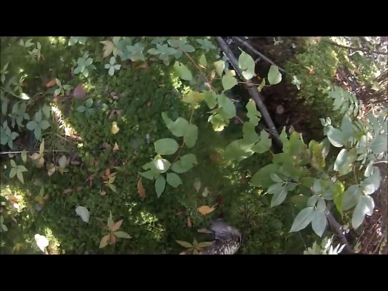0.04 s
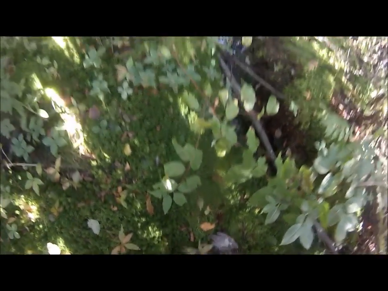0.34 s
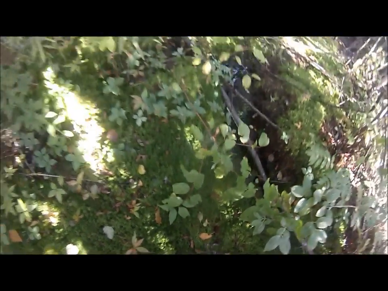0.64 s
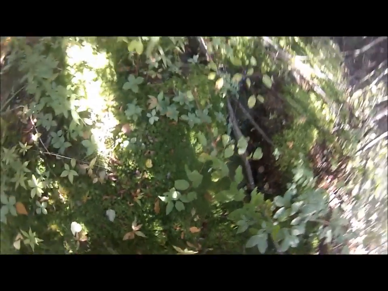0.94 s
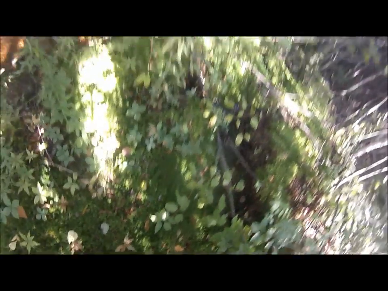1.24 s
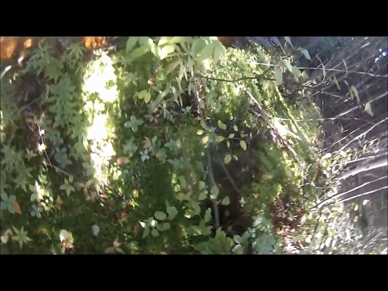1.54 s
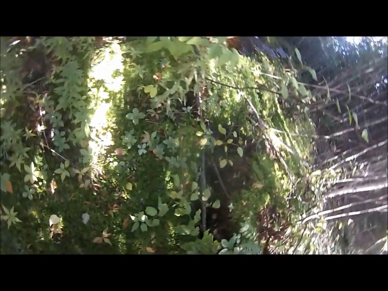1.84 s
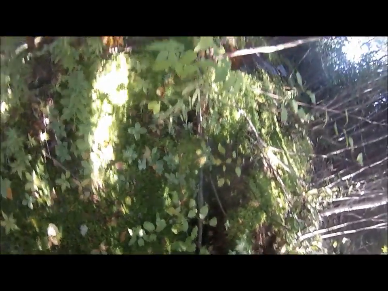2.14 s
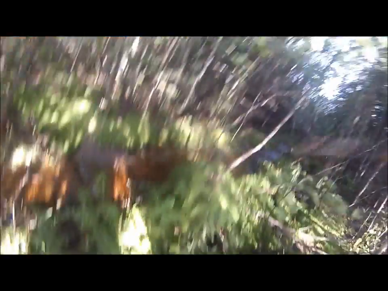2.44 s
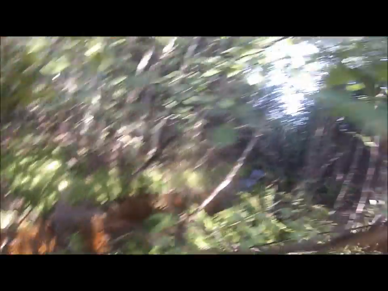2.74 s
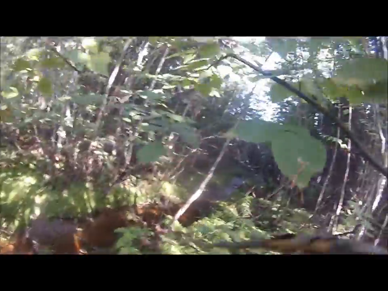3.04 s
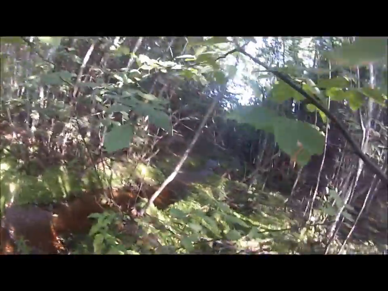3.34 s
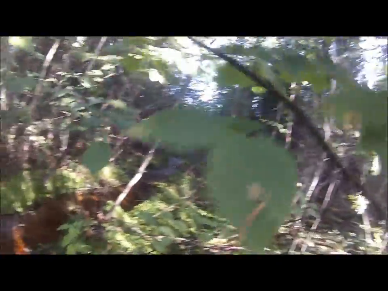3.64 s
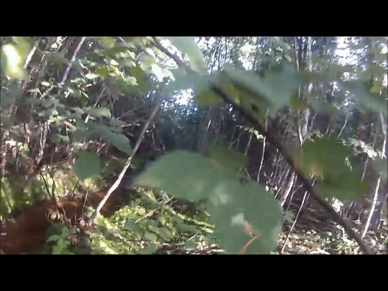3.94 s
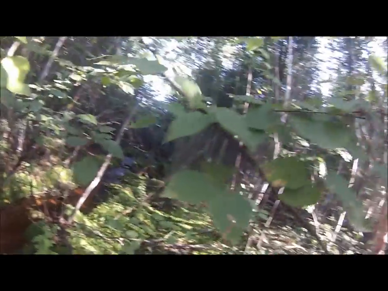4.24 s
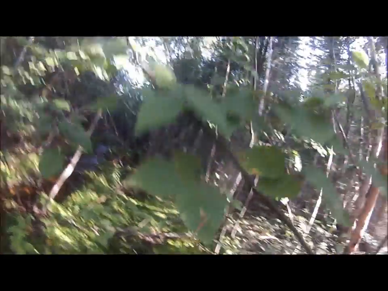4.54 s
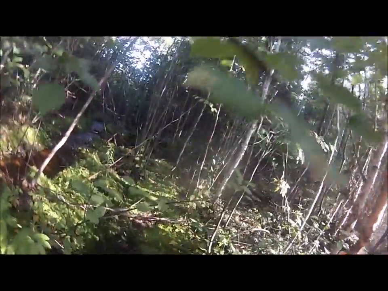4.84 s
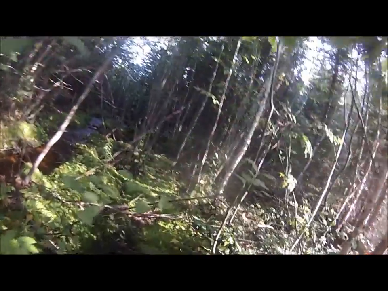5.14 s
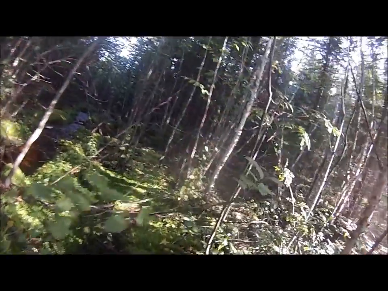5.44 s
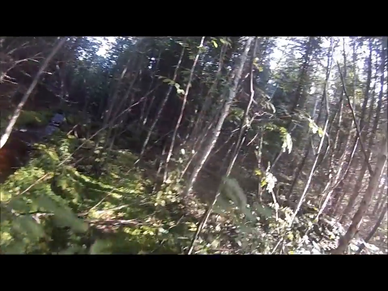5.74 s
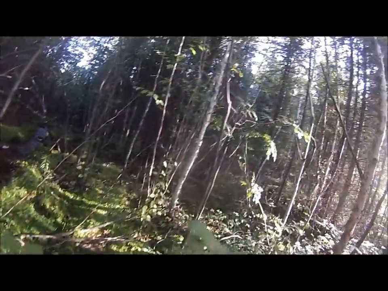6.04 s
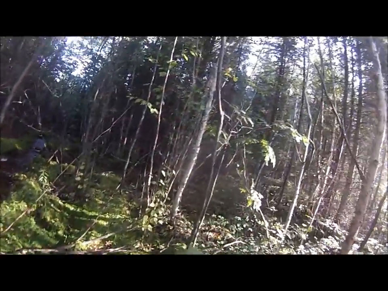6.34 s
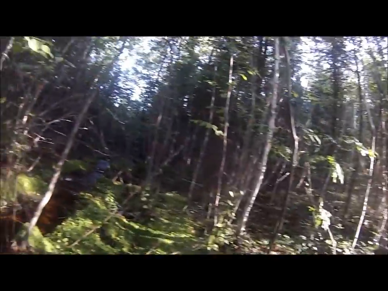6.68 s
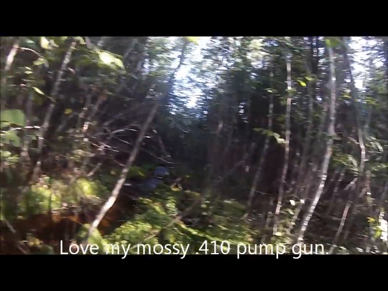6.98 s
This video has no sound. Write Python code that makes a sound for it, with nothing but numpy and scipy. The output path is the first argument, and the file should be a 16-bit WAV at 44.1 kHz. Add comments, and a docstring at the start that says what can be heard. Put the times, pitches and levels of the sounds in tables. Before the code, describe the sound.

Over a faint hush of forest air, hands shift on a pump-action gun with soft, low bumps. About three seconds in, the slide is pulled back with knocks and a coarse scrape, and slams into its stop. A brief low hum follows, then the slide rattles forward and locks with sharp, ringing clacks. Light handling noise trails off. The microphone is fixed to the gun, so everything booms and the hardest hit slightly overloads.

```python
"""A pump-action gun, raised and worked in a quiet forest, heard from a small camera clamped to it.
The slide scrapes back and slams into its stop, parts knock, then it rides forward and locks shut.
The microphone is at contact distance: the action reaches it through the mount and the plastic
housing, which boom, ring and overload it. Behind the handling lies a faint hush of air."""
import sys
import numpy as np
from scipy import signal
from scipy.fft import rfft, irfft, next_fast_len
from scipy.io import wavfile
from scipy.ndimage import uniform_filter1d, map_coordinates

SR = 44100
rng = np.random.default_rng(int(sys.argv[2]) if len(sys.argv) > 2 else 0)


def log_audio(samples):
    """Write samples as a 16-bit WAV file to the path given in sys.argv[1]."""
    # one column per channel
    frames = np.atleast_2d(samples).T
    # limit to full scale, then quantise
    limited = np.clip(frames, -1, 1)
    pcm = np.round(limited * 32767).astype(np.int16)
    wavfile.write(sys.argv[1], SR, pcm)


N = 317961
T = np.arange(N) / SR
AGE = np.arange(SR // 4) / SR  # seconds since a hit


def amp(db):
    """Decibels to gain."""
    return 10 ** (np.asarray(db) / 20)


def unit(x):
    """Scale to rms 1."""
    return x / np.sqrt(np.mean(x ** 2) + 1e-20)


def unit_hit(x):
    """Scale a hit so that its loudest 5 ms have rms 1."""
    return x / np.sqrt(uniform_filter1d(x ** 2, size=220, mode="constant").max())


def curve(points):
    """Join (time_s, value) points, per sample."""
    return np.interp(T, *np.transpose(points))


def wobble(rate):
    """A smooth random curve, rate knots a second."""
    return map_coordinates(rng.standard_normal(int(N * rate / SR) + 4), [T * rate])


def stroke(start, end, attack_s, release_s):
    """One movement: it sets in, holds until its end, then falls 60 dB in the release time."""
    return np.clip((T - start) / attack_s, 0, 1) * amp(-60 * np.maximum(T - end, 0) / release_s)


def together(envelopes):
    """Overlapping movements add in power."""
    return np.sqrt(sum(e ** 2 for e in envelopes))


def add(track, time_s, sound):
    """Mix a sound into the track."""
    part = track[round(time_s * SR):][:len(sound)]
    part += sound[:len(part)]


def filtered(x, response):
    """Shape x by a function of frequency."""
    size = next_fast_len(len(x) + 8192)
    return irfft(rfft(x, size) * response(np.fft.rfftfreq(size, 1 / SR)), size)[:len(x)]


def soften(x, corner_hz):
    """A steep treble roll-off, as through a soft joint."""
    return signal.sosfilt(signal.butter(4, min(corner_hz, SR / 2 - 1), fs=SR, output="sos"), x)


def noise(spectrum, length=N):
    """Noise with a (freq_hz, level_db) spectrum, at rms 1."""
    freqs, db = np.transpose(spectrum)
    white = rng.standard_normal(length)
    return unit(filtered(white, lambda hz: amp(np.interp(np.log(hz + 1), np.log(freqs), db))))


def ring(modes):
    """Damped (pitch_hz, level_db, t60_s) modes, struck with new strengths each time."""
    out = np.zeros(len(AGE))
    for hz, db, t60 in modes:
        strength = amp(db + 1.5 * rng.standard_normal())
        swell = 1 - np.exp(-(4 * hz * AGE) ** 2)
        out += strength * swell * amp(-60 * AGE / t60) * np.sin(2 * np.pi * hz * AGE)
    return out


# the air all around, with the microphone's own hiss: freq_hz, relative_db
HUSH_SPECTRUM = [(140, -29.5), (230, 0), (275, -3.5), (346, -2), (421, -5.5), (485, -3.5), (530, -5),
                 (589, -5), (1180, -9), (1620, -6.5), (1870, -9.5), (4790, -16.5), (13400, -29.5),
                 (14400, -34.5), (16000, -55)]
def forest():
    """A faint, even hush of air and microphone hiss."""
    return amp(-61.5 + 0.35 * wobble(1.8)) * noise(HUSH_SPECTRUM)


# hand movement at the microphone: freq_hz, relative_db
RUMBLE_SPECTRUM = [(12, -13), (25, -3.5), (55, -1.5), (90, -8), (130, -23.5), (250, -74.5)]
def rumble():
    """The deep noise of hands holding the gun."""
    return noise(RUMBLE_SPECTRUM)


# lurches that swing the camera harder: peak_s, relative_db
CAMERA_LURCHES = [(.78, -39), (1.41, -35.5), (2.41, -26.5), (3.03, -23), (3.74, -19.5), (3.83, -22),
                  (4.09, -28.5), (5.58, -35), (5.91, -38)]
def camera_sway(moves, sway_hz=45, lurch_width_s=0.03):
    """The camera swings on its springy mount, even a little at rest."""
    lurches = [amp(db) * np.exp(-0.5 * ((T - s) / lurch_width_s) ** 2) for s, db in CAMERA_LURCHES]
    resting = amp(-50 + 2.7 * wobble(14))
    swaying = together([resting] + moves + lurches)
    phase = 2 * np.pi * sway_hz * T + 0.8 * wobble(6) + 0.5 * wobble(25)
    flutter = amp(-9.5) * rumble()
    return swaying * amp(2 + 1.6 * wobble(24)) * (np.sin(phase) + flutter)


# the plastic shell around the microphone: freq_hz, relative_db
BOOM_SPECTRUM = [(30, -18), (60, -13.5), (88, -10), (108, -8.5), (135, 0.5), (174, -3), (205, -21),
                 (280, -29.5), (500, -72)]
def housing_boom(moves, rest_db=-64.5):
    """The housing booms as the grip moves."""
    gripping = together([amp(rest_db)] + moves)
    boom = noise(BOOM_SPECTRUM)
    power = uniform_filter1d(np.abs(signal.hilbert(boom)) ** 2, size=2400) / 2
    boom /= np.sqrt(power)  # the hands keep an even strength
    return gripping * amp(2.5 * wobble(23)) * boom


# low modes of the whole camera: pitch_hz, relative_db, t60_s
THUD_MODES = [(45, -17.5, 0.3), (133.7, 2, .055), (177, -0.5, 0.015)]
def thud(corner_hz):
    """A dull push on the whole camera."""
    return unit_hit(soften(ring(THUD_MODES), corner_hz))


# the grip shifts, close to the microphone: start_s, level_db
GRIP_SHIFTS = [(0.271, -46.5), (0.683, -40), (.73, -50), (.785, -48), (0.848, -47), (1.354, -45),
               (1.489, -43), (2.231, -35), (2.374, -25), (4.07, -29), (4.47, -43), (4.569, -41.5),
               (4.854, -35.5), (5.135, -37), (5.164, -39.5), (7.16, -41)]
def grip_bumps():
    """Each shift of the grip gives the camera a soft thud."""
    out = np.zeros(N)
    for start, db in GRIP_SHIFTS:
        add(out, start, amp(db) * thud(corner_hz=170))
    return out


# lift, pull, hold open, push, lock, aim: start_s, end_s, sway_relative_db, boom_db
HAND_MOVES = [(0.654, 0.864, -37, -49.5), (1.324, 1.64, -42.5, -62), (2.209, 2.85, -39, -49.5),
              (2.87, 3.041, -23.5, -20.5), (3.048, 3.181, -27, -30), (3.24, 3.605, -30, -48),
              (3.605, 3.88, -26, -31), (3.877, 4.113, -31, -47), (4.218, 4.576, -50, -54.5),
              (5.299, 6.0, -43.5, -53.5), (6.04, 6.503, -43, -58)]
def handling(attack_s=0.023):
    """Moving the gun sways the camera and booms its housing; the hands never quite rest."""
    sways, booms = [], []
    for start, end, sway_db, boom_db in HAND_MOVES:
        sways.append(amp(sway_db) * stroke(start, end, attack_s, release_s=0.35))
        booms.append(amp(boom_db) * stroke(start, end, attack_s, release_s=0.23))
    sway = camera_sway(sways)
    tremor = amp(-52.5 + 1.2 * wobble(9)) * unit(soften(rumble(), corner_hz=55))
    return sway + tremor + housing_boom(booms) + grip_bumps()


# the hollow barrel, heard through the mount: pitch_hz, level_db, t60_s
BARREL_MODES = [(317.5, -15.5, 0.14), (541, -20, 0.1), (644, -17.5, 0.166)]
def open_breech(hum_hz=118.4):
    """With the action open a part hums on until the hand pushes forward, and a knock rings the barrel."""
    hum_db = curve([(3.18, -120), (3.195, -25.5), (3.6, -29.5), (3.66, -120)])
    out = amp(hum_db) * np.sin(2 * np.pi * hum_hz * T)
    add(out, 3.484, ring(BARREL_MODES))
    return out


def rattle(start_s=3.64, end_s=3.84, ticks_per_s=45, pitch_hz=2270):
    """The loose fore-end gives small, dull ticks, unevenly spaced along its forward ride."""
    out = np.zeros(N)
    modes = [(pitch_hz, 0, 0.035), (pitch_hz * 0.87, -7, 0.02), (pitch_hz, -6, 0.02)]
    slots = np.arange(start_s, end_s, 1 / ticks_per_s)
    for slot, (late, size) in zip(slots, rng.standard_normal((len(slots), 2))):
        tick = unit_hit(soften(ring(modes), corner_hz=2700))
        add(out, slot + 0.43 * late / ticks_per_s, amp(-39 + 3 * size) * tick)
    return out


def slips(per_s, spread_db):
    """Tiny stick-slip impulses of uneven size."""
    slipping = rng.random(N) < per_s / SR
    return slipping * rng.choice([-1, 1], N) * amp(spread_db * rng.standard_normal(N))


def friction(impulses, peaks, corner_hz):
    """Slips excite resonances of alternating polarity; the result has rms 1."""
    def response(f):
        return sum((-1) ** k * amp(db) * 1j * f * width / (hz * hz - f * f + 1j * f * width)
                   for k, (hz, width, db) in enumerate(peaks))
    return unit(soften(filtered(impulses, response), corner_hz))


# resonances of the rubbing fore-end: pitch_hz, width_hz, relative_db
RUB_PEAKS = [(800, 330, -24), (1500, 270, -13), (1910, 170, -5.5), (2270, 130, -6.5), (2750, 120, -20),
             (3430, 120, -19.5), (4800, 210, -30.5)]
# it is gripped, then rides forward: start_s, end_s, level_db
RUB_STROKES = [(2.21, 2.44, -62.5), (2.594, 2.728, -61.5), (2.698, 2.825, -54.5), (3.404, 3.422, -54),
               (3.618, 3.977, -46.5)]
def fore_end_rub():
    """Light friction makes a ringing rub."""
    rub = friction(slips(per_s=3100, spread_db=2), RUB_PEAKS, corner_hz=4610)
    rubbing = together(amp(db) * stroke(start, end, attack_s=0.022, release_s=0.12)
                       for start, end, db in RUB_STROKES)
    return rubbing * amp(1.5 * wobble(88)) * rub


# the slide presses unevenly on its rails: time_s, level_db
RAIL_FRICTION = [(2.89, -28), (2.955, -29), (3.012, -22.5), (3.05, -30.5), (3.095, -24), (3.15, -34.5),
                 (3.18, -24.5), (3.21, -35)]
# its resonances early in the stroke and near the stop: pitch_hz, width_hz, relative_db
EARLY_PEAKS = [(320, 98, -10.5), (490, 97, -10), (800, 110, -16), (1560, 140, 4), (1800, 460, -6),
               (2430, 150, -13), (3470, 580, -21), (3900, 260, -21.5), (4730, 260, -23), (6597, 500, -34),
               (7500, 510, -39), (10314, 900, -43)]
LATE_PEAKS = [(1700, 140, -8), (1980, 150, -0.5)]
def slide_scrape():
    """The slide is drawn back in one coarse scrape, its pitch climbing as the free length shortens."""
    stick_slip = slips(per_s=2800, spread_db=3)
    early = friction(stick_slip, EARLY_PEAKS, corner_hz=10020)
    late = friction(stick_slip, LATE_PEAKS, corner_hz=6000)
    late_share = curve([(3.06, 0.0023), (3.19, 0.55)])
    scrape = np.sqrt(1 - late_share) * early + np.sqrt(late_share) * late
    pressure = amp(curve(RAIL_FRICTION) + 2.8 * wobble(110))
    return pressure * stroke(2.873, 3.213, attack_s=0.006, release_s=0.031) * scrape


# modes of the housing and action, and of the camera mount: pitch_hz, relative_db, t60_s
HOUSING_MODES = [(1466, -9.5, 0.028), (1753, -6.5, 0.02), (1950, -8.5, 0.03), (2200, -30, 0.035),
                 (2320, -19, 0.02026), (2700, -22, 0.021), (3341, -20, 0.024), (3910, -26, 0.044),
                 (4446, -26, 0.016)]
MOUNT_MODES = [(362, -0.5, 0.0074), (448, 3.5, 0.013), (650.4, -7.5, 0.015), (800, -0.5, 0.017)]
# metal surfaces cracking together, close up: freq_hz, relative_db
CRACK_SPECTRUM = [(1500, -30.5), (2900, 0.5), (3800, -2), (4500, 13.5), (5150, -8.5), (5900, 1), (6700, -9),
                  (8000, -14), (10500, -20.5), (13000, -32.5), (16000, -50.5)]
def blow(pitch_hz, ring_db, crack_db, knock_db, thud_db, ring_t60_s, crack_t60_s, chatter, contact_s):
    """One contact: the part and the housing ring, the surfaces crack, the mount knocks and thuds."""
    fall_db = -60 * np.maximum(AGE - contact_s, 0) / crack_t60_s  # surfaces grind before they part
    force = chatter * rng.standard_normal(len(AGE)) * amp(fall_db / 2)
    force[0] = 1  # the impact itself
    part = [(pitch_hz, 0, ring_t60_s), (pitch_hz * 1.7, -11, ring_t60_s / 2)]
    # modes near the part's pitch answer most
    coupled = [(hz, db - 5 * abs(np.log2(hz / pitch_hz)), t60) for hz, db, t60 in HOUSING_MODES]
    metal = signal.fftconvolve(force, ring(part + coupled))[:len(AGE)]
    bass_cut = signal.butter(2, 1100, "highpass", fs=SR, output="sos")  # small parts carry no bass
    metal = soften(signal.sosfilt(bass_cut, metal), corner_hz=4470)
    tail = amp(-27.5 - 60 * AGE / 0.055)
    crack = noise(CRACK_SPECTRUM, len(AGE)) * (amp(fall_db) + tail)
    crack = soften(crack, corner_hz=17000 * amp(crack_db / 6))  # harder blows are brighter
    knock = soften(ring(MOUNT_MODES), corner_hz=1490)
    return (amp(ring_db) * unit_hit(metal) + amp(crack_db) * unit_hit(crack)
            - amp(knock_db) * unit_hit(knock) + amp(thud_db) * thud(corner_hz=310))


# metal parts meet, right by the microphone: start_s, pitch_hz, ring_db, crack_db, knock_db, thud_db
PART_CONTACTS = [(2.874, 1364, -16, -40.5, -9, -9), (2.889, 1640, -21.5, -32, -21, -36.5),
                 (2.932, 1510, -12.5, -41, -20, -13.5), (3.022, 1510, -16.5, -38.5, -20.5, -13.5),
                 (3.07, 1560, -24, -56, -44, -31), (3.078, 1660, -20, -63, -22, -19.5),
                 (3.097, 1510, -21.5, -64, -41, -34), (3.124, 1605, -16.5, -22, -35, -22),
                 (3.277, 2300, -36, -58, -43, -25.5), (3.292, 2250, -40, -51, -48.5, -37),
                 (3.4832, 1390, -13.5, -33, -14.5, -14), (3.496, 1490, -25.5, -30, -21.5, -16.5),
                 (3.5065, 2595, -17.5, -43, -36, -30), (3.517, 2330, -24, -51, -34.5, -45.5),
                 (3.621, 1870, -20, -60, -21.5, -8.5), (3.693, 2080, -28, -68, -40, -22),
                 (3.719, 2240, -34, -73, -45, -27.5), (3.845, 2240, -20, -50.5, -28, -14.5),
                 (3.8536, 2227, -16, -52, -26.5, -25.5), (3.858, 2200, -14, -51, -30.5, -25.5),
                 (3.9275, 2560, -24.5, -49, -41.5, -47), (3.959, 1430, -16.5, -43, -40, -33),
                 (3.9826, 2032, -11, -42, -41, -41), (4.105, 2142, -46, -46.5, -50.5, -29),
                 (5.558, 1950, -46, -52, -60, -65), (5.616, 1450, -55, -70, -63, -70),
                 (5.632, 1990, -55, -73, -73, -51), (6.6, 1520, -56.5, -76, -70, -71)]
# the slide and bolt hit their stops: start_s, pitch_hz, ring_db, crack_db, knock_db, thud_db
STOP_SLAMS = [(3.1897, 2007, 6, 1, -7, -19), (3.6277, 2244, -5, -21.5, -23.5, -6.5),
              (3.9068, 1803, 4.5, -11.5, -12.5, -14.5)]
# the lock's spring rings on as the lock snaps up: pitch_hz, level_db, t60_s
LOCK_SPRING_MODES = [(1500, -15.5, 0.046), (2160, -36, 0.13), (2912, -44, .044), (3670, -36, 0.089),
                     (3887, -39, 0.05), (4576, -51.5, .048), (8096, -48, 0.037)]
def pump_action():
    """Clicks and knocks of the mechanism, hard slams at the ends of its travel, the ring of the lock."""
    out = np.zeros(N)
    for start, *strike in PART_CONTACTS:
        click = blow(*strike, ring_t60_s=0.025, crack_t60_s=0.018, chatter=0.021, contact_s=0.00077)
        add(out, start, click)
    for start, *strike in STOP_SLAMS:
        slam = blow(*strike, ring_t60_s=0.015, crack_t60_s=0.0032, chatter=0.031, contact_s=0.0024)
        add(out, start, slam)
    add(out, 3.982, ring(LOCK_SPRING_MODES))
    return out


def scene():
    """One microphone on the gun feeds both channels."""
    gun = pump_action() + open_breech() + slide_scrape() + fore_end_rub() + rattle()
    mono = gun + handling() + forest()
    return np.array([mono, mono])


def record(dry):
    """The camera's gain ducks after an overload, what is still too loud clips, the band ends steeply."""
    mic = dry.mean(axis=0)
    overloaded = np.abs(mic) > 1.2
    since_s = T - np.maximum.accumulate(np.where(overloaded, T, -SR))
    duck_db = -7 * np.exp(-since_s / 0.031) * (1.5 - np.exp(-since_s / 0.0028))
    ducked = mic * amp(duck_db)
    clipped = ducked / (1 + np.abs(ducked) ** 6) ** (1 / 6)
    dulled = soften(clipped, corner_hz=12500)
    out = filtered(dulled, lambda hz: np.clip((16300 - hz) / 1500, 0, 1))
    return np.array([out, out])


dry = scene()
out = record(dry)
log_audio(out)
```